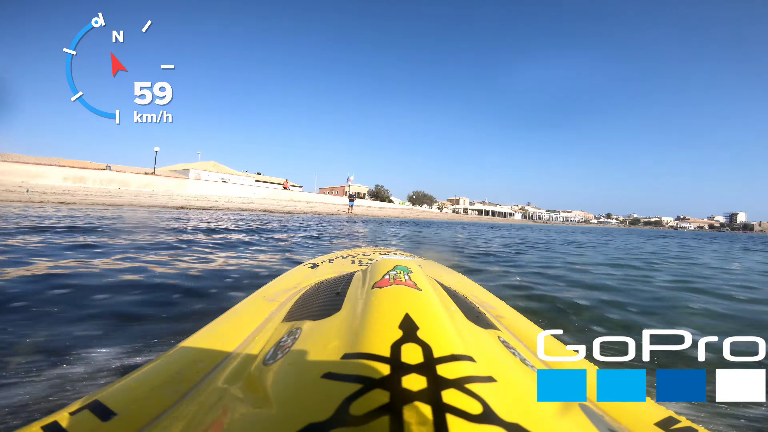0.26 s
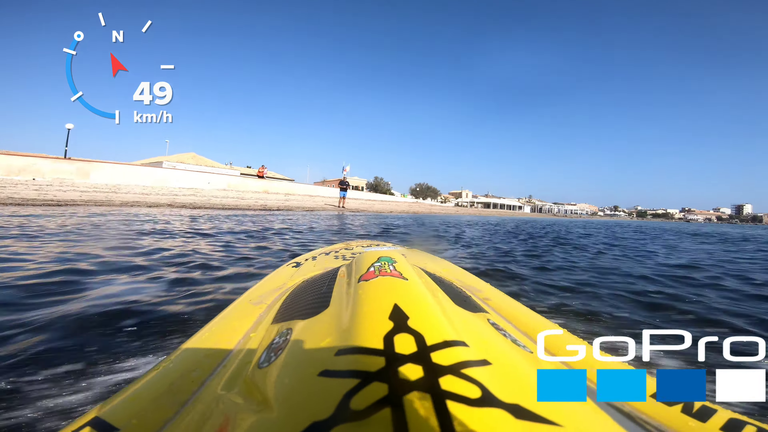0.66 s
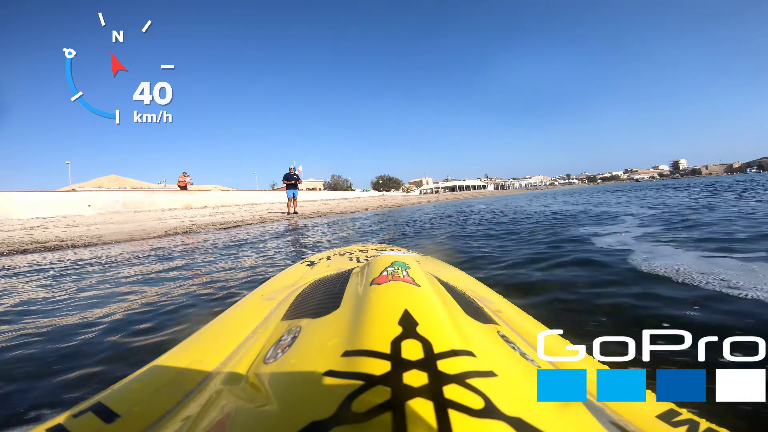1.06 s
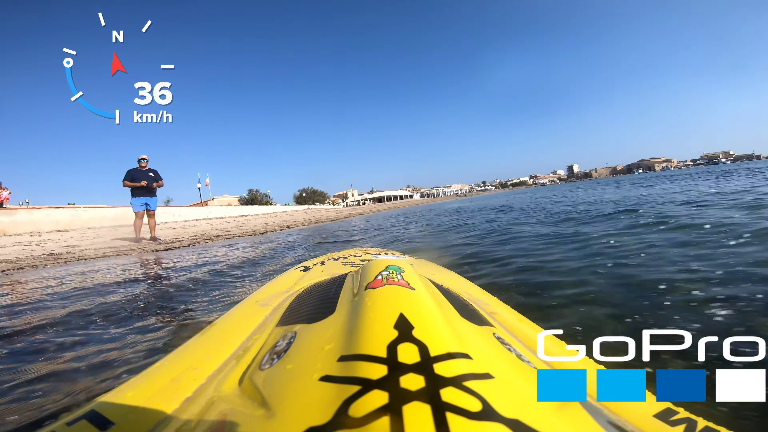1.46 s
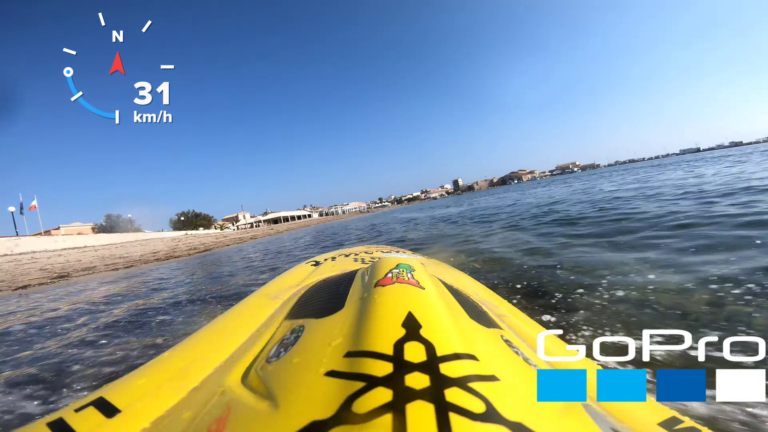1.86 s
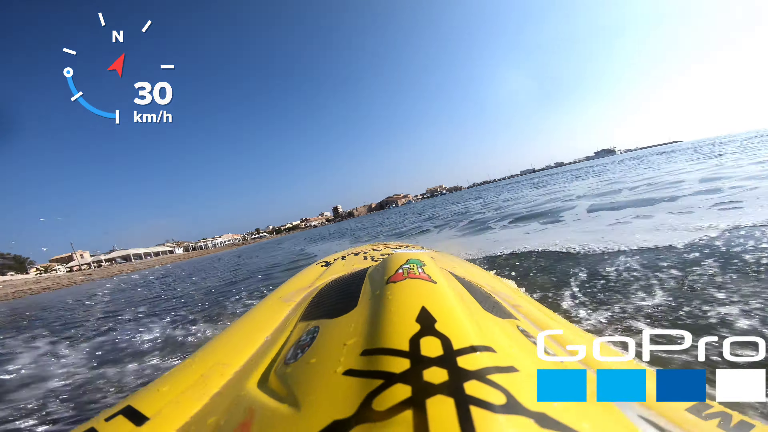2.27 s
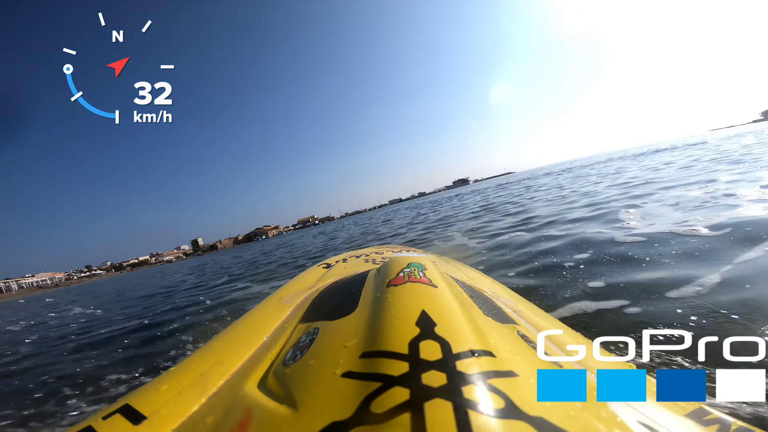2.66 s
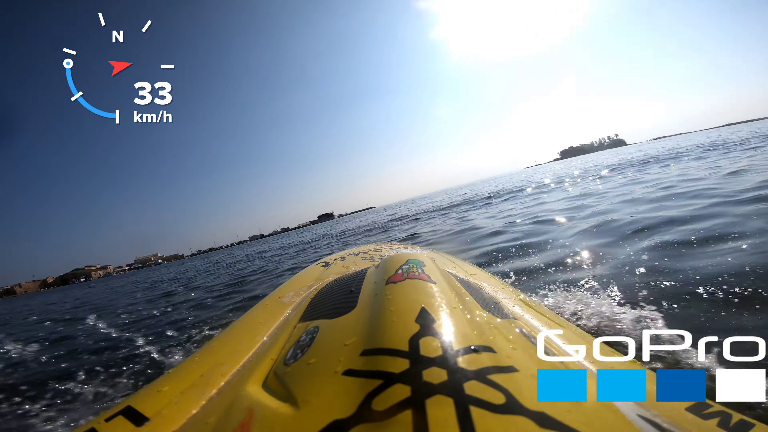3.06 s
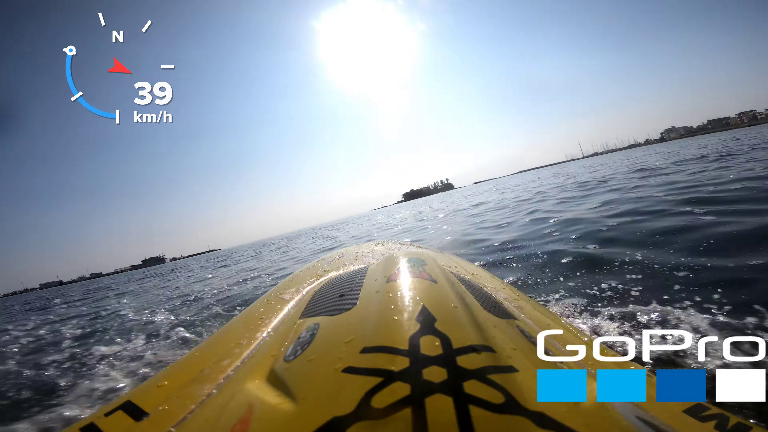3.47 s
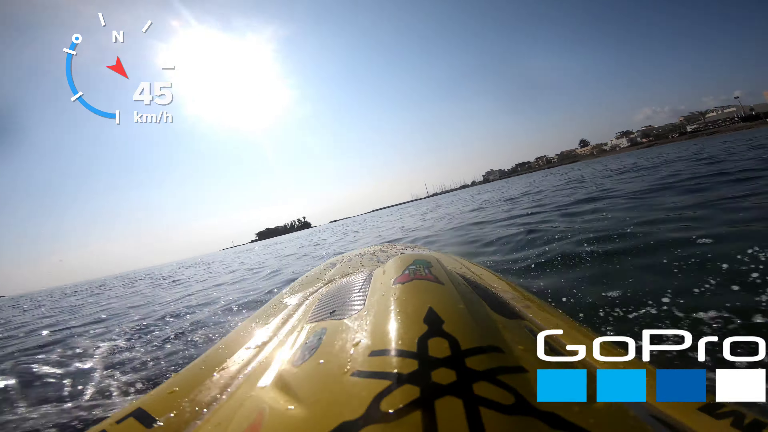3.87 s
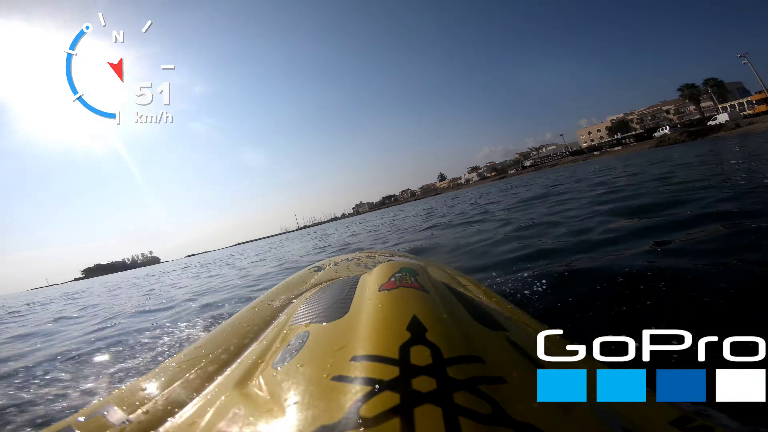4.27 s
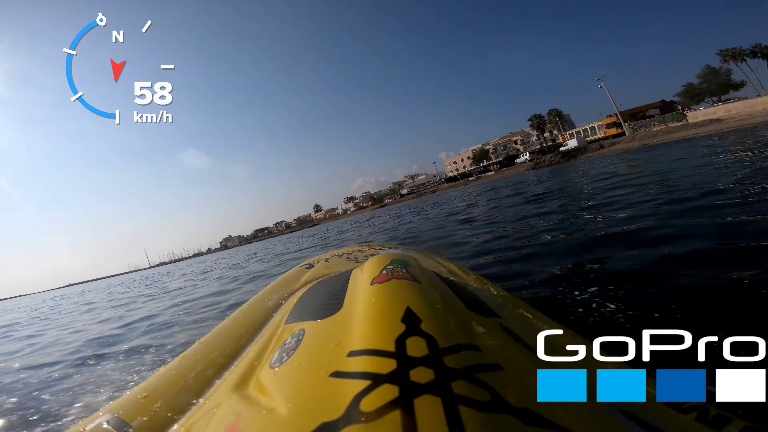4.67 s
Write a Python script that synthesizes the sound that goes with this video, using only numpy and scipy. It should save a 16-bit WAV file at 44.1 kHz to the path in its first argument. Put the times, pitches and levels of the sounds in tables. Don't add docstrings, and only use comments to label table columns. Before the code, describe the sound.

Buzzing electric propeller whine falls, wavers and rises again, heard through a plastic hull with low water rumble, slaps and rough sputters.

```python
import sys
import numpy as np
from scipy import signal
from scipy.fft import rfft, irfft, next_fast_len
from scipy.io import wavfile
from scipy.ndimage import uniform_filter1d

SR = 44100
rng = np.random.default_rng(int(sys.argv[2]) if len(sys.argv) > 2 else 0)


def to_wav(sig):
    pcm = np.clip(np.atleast_2d(sig), -1, 1) * 32767
    pcm = np.round(pcm).astype(np.int16)
    wavfile.write(sys.argv[1], SR, pcm.T)


def gain_from_decibels(decibels):
    exponent = np.asarray(decibels, float) / 20
    return 10 ** exponent


N = 261321
REFERENCE_TURNS = 400

# frequency in Hz, level in dB per Hz.
RATTLE_SPECTRUM = [(530, -30.5), (900, -10.5), (1190, -3.5), (1300, -3), (1570, -6), (1730, -8.5),
                   (2270, -14), (2570, -10), (3060, -12.5), (3640, -18), (4110, -9.5), (4400, -11),
                   (5070, -26), (5800, -67)]


def rms_one(x):
    return x / np.sqrt(np.mean(x ** 2) + 1e-20)


def in_time(rows):
    seconds, *columns = np.transpose(rows)
    return [np.interp(np.arange(N) / SR, seconds, column) for column in columns]


def humps(rows, power=2):
    t = np.arange(N) / SR
    return np.array([np.exp(-((t - row[0]) / row[1]) ** power) for row in rows])


def drift(rate):
    every = 20
    pole = np.exp(-2 * every * np.pi * rate / SR)
    steps = rng.standard_normal(N // every + 4002)
    slow = signal.lfilter([1], [1, -2 * pole, pole * pole], steps)[4000:]
    return np.interp(np.arange(N) / every, np.arange(len(slow)), rms_one(slow))


def lift(peaks, at):
    return sum(lift_db / (1 + (2 * (at - centre) / width) ** 2) for centre, width, lift_db in peaks)


def speed_law(turns, reference_db, below_db, above_db):
    octaves = np.log2(turns / REFERENCE_TURNS)
    return reference_db + below_db * np.minimum(octaves, 0) + above_db * np.maximum(octaves, 0)


def resonance(x, hz, width):
    pole = np.exp(-np.pi * width / SR)
    feedback = [1, -2 * pole * np.cos(2 * np.pi * hz / SR), pole * pole]
    return signal.lfilter(np.array([1, 0, -1]) * (1 - pole * pole) / 2, feedback, x)


def hull_db(spectrum, hz):
    # resonance in Hz, width in Hz, lift in dB.
    deck = [(273.8, 35, 6), (475, 27, 2), (1094, 370, 6), (1460, 92, 7.5), (2550, 120, 5.5), (3100, 300, 8),
            (4450, 2000, -3)]
    point_hz, point_db = np.transpose(spectrum)
    return np.interp(np.log(hz), np.log(point_hz), point_db) + lift(deck, hz)


def through_hull(x, spectrum):
    size = next_fast_len(N)
    hz = np.maximum(np.fft.rfftfreq(size, 1 / SR), 10)
    return rms_one(irfft(rfft(x, size) * gain_from_decibels(hull_db(spectrum, hz)), size)[:N])


def thumps(per_s, spread_db):
    # frequency in Hz, width in Hz, level in dB.
    modes = [(51.4, 20, 5), (94.3, 19, -1.5), (121.6, 28, -5.5), (143.4, 42, -19.5)]
    out = 0
    for hz, width, level_db in modes:
        sizes = gain_from_decibels(spread_db * np.minimum(rng.exponential(1, N), 3)) * rng.choice([-1, 1], N)
        knocks = (rng.random(N) < per_s / SR) * sizes
        ringing = resonance(resonance(knocks, hz, width), hz, 3 * width)
        out = out + gain_from_decibels(level_db) * rms_one(ringing)
    return rms_one(signal.sosfilt(signal.butter(2, 35, "high", fs=SR, output="sos"), out))


def slaps():
    # peak in seconds, level in dB.
    slap_times = [(.04, -14), (.37, -15.5), (.49, -19), (0.631, -18.5), (.76, -24), (1.1, -19), (1.26, -25),
                  (1.41, -20.5), (1.69, -15.5), (1.95, -22), (2.34, -22), (2.6, -25), (2.78, -16),
                  (2.95, -22), (3.17, -15), (3.4, -16), (3.6, -17.5), (3.85, -43), (4.221, -19),
                  (4.35, -18.5), (4.48, -22), (4.64, -20), (4.92, -21), (5.11, -10), (5.22, -19),
                  (5.45, -16), (5.66, -17), (5.83, -11.5)]
    rise_s, fall_s = 0.029, 0.05
    peak_s, level_db = np.transpose(slap_times)
    since = np.arange(N) / SR - peak_s[:, None]
    return gain_from_decibels(level_db) @ np.exp(-(since / np.where(since < 0, rise_s, fall_s)) ** 2)


def wash(patchy_db):
    # frequency in Hz, level in dB per Hz.
    wash_spectrum = [(90, -58), (150, -39), (190, -32.5), (240, -6.5), (330, -12.5), (400, -5),
                     (528, -13.5), (600, -18.5), (800, -30), (1470, -30.5), (2200, -38), (2860, -78.5)]
    lumps_db = patchy_db * (drift(15) + 0.72 * drift(75))
    return through_hull(rng.standard_normal(N) * gain_from_decibels(lumps_db), wash_spectrum)


def spray(angle, gate, patchy_db):
    # frequency in Hz, level in dB per Hz.
    spray_spectrum = [(4200, -23.5), (5100, 2.5), (5600, 0.5), (6200, 1.5), (6800, -1.5), (7300, 0),
                      (7800, -7.5), (8500, -6), (9500, -14), (10500, -13.5), (11000, -22.5), (12500, -20),
                      (13500, -24.5), (15500, -45.5)]
    pulsing = 1 + gate * np.cos(angle)
    spurts = gain_from_decibels(patchy_db * (drift(22) + drift(150)))
    return through_hull(rng.standard_normal(N) * pulsing * spurts, spray_spectrum)


def rattle(angle, gate, patchy_db):
    pulsing = 1 + gate * np.cos(angle)
    return through_hull(rng.standard_normal(N) * pulsing * gain_from_decibels(patchy_db * drift(37)), RATTLE_SPECTRUM)


def air_bites():
    # centre in seconds, half length in seconds, shake in radians, froth in dB,
    # racing in extra turns per s.
    bites = [
        (0.293, .045, 0.2, -38, 30),
        (0.49, 0.034, 0.25, -34, 2),
        (1.738, 0.022, 0.23, -29, 1),
        (2.782, 0.056, 0.22, -40, 1),
        (4.901, .045, 0.5, -19, 45),
        (5.074, .008, 0.28, -23.5, 1.5),
        (5.204, 0.035, 0.56, -20, 28),
        (5.411, 0.065, 0.32, -28, -1),
    ]
    bells = humps(bites, power=4)
    _, _, shake, froth_db, race = np.transpose(bites)
    return shake @ bells, gain_from_decibels(froth_db) @ bells, race @ bells


def froth_noise():
    white = rng.standard_normal(N) * gain_from_decibels(1.4 * drift(40))
    rings = 0
    for hz, width, gain in [(1450, 240, 1), (2850, 600, 0.17), (4200, 800, 0.2)]:
        rings = rings + gain * rms_one(resonance(resonance(white, hz, width), hz, width))
    return rms_one(signal.sosfilt(signal.butter(6, 4800, fs=SR, output="sos"), rings))


def surges():
    # centre in seconds, half length in seconds, extra turns per s, imbalance tone in dB.
    waves = [(0.191, .08, -7, 3.5), (0.263, 0.057, 0, -2.5), (0.398, 0.035, 0, -11.5), (0.473, .04, 24, -3),
             (0.573, 0.024, 0, 2), (0.654, .04, -4, -3), (1.291, .05, -13.5, -3), (3.31, .04, 6, 2),
             (1.648, .08, 0, -4.5), (1.964, 0.03947, 10, -1.5), (2.097, 0.075, -1, 3), (2.338, .1, -7, 0.5),
             (2.597, 0.0707, -4.5, 1), (2.796, .05, 2.5, -14), (3.193, .07, -9, -2.5), (3.446, .04, -5, 1),
             (3.554, .04, 6, 1), (3.78, .12, -9, 0.5), (4.072, .05, -5, 0), (4.193, 0.052, 6, -1),
             (4.278, .04, -3.5, -2.5), (4.641, 0.037, 7.5, -5.5), (4.812, .03, -8, -2.5),
             (4.973, 0.027, 1, 3.5), (5.036, .03, -6, -6), (5.142, 0.066, -2, -0.5),
             (5.385, 0.064, 0.5, -5.5), (5.459, .04, -6.5, -3), (5.601, .05, -8, 2.5),
             (5.77, .05, 9.5, 2.5)]
    return np.transpose(waves)[2:] @ humps(waves)


def chopper():
    return np.sqrt(2) * gain_from_decibels(-88) * np.sin(2 * np.pi * 7966 * np.arange(N) / SR)


def whip(angle, turns, flutter_db):
    # multiple of shaft speed, level in dB.
    half_orders = [(.5, 0), (1.5, -13), (2.5, -15), (3.5, -15), (5.5, -24), (6.5, -18)]
    # turns per s, width in turns per s, lift in dB.
    critical_speeds = [(265, 17, 8), (415.7, 45, 17), (596, 230, -7.5)]
    lines = sum(gain_from_decibels(db) * np.sin(k * angle + rng.uniform(0, 2 * np.pi)) for k, db in half_orders)
    level_db = -40.5 + lift(critical_speeds, turns) + flutter_db * drift(24)
    return np.sqrt(2) * gain_from_decibels(level_db) * lines


def order_levels(turns, load_db, imbalance_db):
    # dB at the reference speed, dB gained per doubling of speed,
    # share of the blade load.
    order_law = [(-16, -5, 0.067), (-21.5, 0.9, 1.3), (-34.5, 0, 0.5), (-34, 7, 1.3), (-41, 3, 0.9),
                 (-47, 5.5, 0.2)]
    # Hz, width in Hz, lift in dB.
    mount = [(259, 34, -5.5), (308, 61, 1.5), (400, 73, 5.5), (524, 30, 1.5), (602, 80, 2), (708, 81, 5.5),
             (840, 125, -14.5), (1080, 110, 2.5), (1373, 200, 2.5), (1590, 180, 4.5), (1811, 62, 6.5),
             (1992, 170, -11), (2565, 180, 7.5), (2870, 340, 2.5)]
    # centre in seconds, half length in seconds, dB.
    order_spells = [
        [(1.0, .08, 3), (4.05, .1, -4), (4.73, .06, -11.5), (5.83, .06, -11)],
        [(.52, .05, 12), (3.4, .3, -4.5), (4.25, .06, -7.5), (4.55, .15, 1), (5.4, .06, 8.5)],
        [(1.15, .2, -5), (2.0, .06, -12.5), (2.42, .17, 5), (3.2, .06, -14), (3.87, .08, -1.5), (4.5, .08, -7),
         (4.9, .2, 5.5), (5.4, .05, -8)],
        [(.15, .2, -5.5), (1.0, .25, -11.5), (1.68, .12, 8), (2.55, .15, 8), (3.05, .2, -9.5), (4.7, .04, 8.5)],
        [(.15, .15, -10), (.49, .04, 9.5), (2.8, .05, 4), (3.42, .06, -5), (3.65, .12, 6.5), (4.57, .04, 9.5),
         (5.4, .05, 6)],
    ]
    # centre and half length in seconds, dB.
    further_spells = [
        [(.04, 0.065, 3.5), (.17, 0.036, -4.5), (.46, 0.033, 9), (4.17, .07, -4.5), (5.35, .03, 5.5),
         (1.35, 0.053, -4.5), (2.2, .4, 2.5), (3.5, 0.059, -4.5), (5.52, 0.053, -6.5)],
        [(1.43, 0.048, -12), (1.72, .13, 6.5), (2.55, 0.16, 6.5), (4.07, .08, 8.5), (5.03, 0.041, 6)],
        [(2.55, 0.041, 8), (3.39, .1, 2.5), (4.22, 0.037, -2.5), (2.8, 0.055, 8), (5.46, 0.018, 9)],
        [(4.1, .15, -0.5), (4.47, 0.096, -13.5), (5.04, 0.037, 9.5), (5.75, .12, 7)],
        [(1.0, .06, -5.5), (1.7, .1, 8.5), (4.3, 0.037, 7), (4.42, .05, -8), (4.67, 0.041, 0)],
    ]
    octaves = np.log2(turns / REFERENCE_TURNS)
    levels = []
    for k, (db, gain_db, share) in enumerate(order_law, 1):
        levels.append(db + gain_db * octaves + share * load_db + lift(mount, k * turns))
    levels[0] = levels[0] + imbalance_db
    for i, (own, more) in enumerate(zip(order_spells, further_spells), 1):
        spells = list(own) + list(more)
        settling_db = 1.17 * drift(1.7)
        levels[i] = levels[i] + np.transpose(spells)[2] @ humps(spells) + settling_db
    return levels


def motor(angle, turns, tones_db, rattle_db, flutter_db):
    # multiple of shaft speed, dB against the rattle at that pitch.
    weak_orders = [(7, -8), (8, -7), (9, -9), (10, -9), (12, -10), (14, -9), (15, -11)]
    out = 0
    for k, tone_db in enumerate(tones_db, 1):
        level_db = tone_db + flutter_db * k ** 0.41 * drift(30)
        out = out + gain_from_decibels(level_db) * np.sin(k * angle + rng.uniform(0, 2 * np.pi))
    sharpen_db = 11.5 * np.log2(turns / REFERENCE_TURNS)
    for k, order_db in weak_orders:
        level_db = rattle_db + order_db + hull_db(RATTLE_SPECTRUM, np.maximum(k * turns, 900))
        level_db += sharpen_db + 1.8 * drift(9) + 3 * drift(30)
        out += gain_from_decibels(level_db) * np.sin(k * angle + rng.uniform(0, 2 * np.pi))
    return np.sqrt(2) * out


def scene():
    # time in seconds, shaft turns per s.
    throttle = [(0, 635), (.365, 628), (.412, 455), (.62, 312), (.8, 263), (.99, 245), (1.17, 299),
                (1.4, 341), (1.9, 293), (2.68, 300.4), (2.88, 353), (4.4, 466), (4.6, 524), (4.72, 634),
                (5.32, 636), (5.375, 464), (5.55, 359), (5.93, 279)]
    # time in seconds, blade load in dB, shaking in dB.
    strain = [(0, -1.5, -1), (.34, 0, 1), (.42, -6.5, -5.5), (.5, -4.5, 1), (.62, -6.5, 1.5),
              (.95, 1.5, 1.5), (1.25, -4, 0), (1.7, -2, 2.5), (2.2, 0.5, 0.5), (2.8, -4, 4), (3.3, 0, 1),
              (3.8, -2.5, -2.5), (4.3, 2.5, 3), (4.6, 4, -0.5), (4.8, -2, 1), (5.3, -1, 1), (5.42, 1.5, 0),
              (5.65, -9, 0)]
    # time in seconds, chop in dB, wetted area in dB.
    water_state = [(0, -18, 4), (.15, -19, 5), (.3, -24, -6), (.55, -24, -1.5), (.75, -20.5, 2.5),
                   (1.3, -24.5, 0.5), (1.8, -20.5, 1.5), (2.5, -26, -0.5), (3.05, -23, 3.5),
                   (3.4, -24, -1.5), (3.7, -27, -4.5), (4.1, -24.5, 4), (4.3, -20.5, -4), (4.7, -14, 5),
                   (5.0, -19.5, -6), (5.3, -14, 0.5), (5.5, -18, -0.5), (5.93, -24, 0.5)]
    demand, = in_time(throttle)
    load_db, shaking_db = in_time(strain)
    chop_db, wetted_db = in_time(water_state)
    surge, imbalance_db = surges()
    shake, froth, race = air_bites()

    inertia_s = 0.018
    turns = uniform_filter1d(demand, size=int(inertia_s * SR)) + surge
    load_db = load_db - 9 * shake
    rattle_db = speed_law(turns, -45, 4.6, 8.3) + shaking_db + 10 * shake + 12
    spray_db = speed_law(turns, -65.5, 2, 18.7) + shaking_db + 10.5 * shake
    chop, slap = gain_from_decibels(chop_db), slaps()
    wash_db = speed_law(turns, -23, -4.5, -12.5) + wetted_db + 2.5 * slap / (slap + chop)

    slowing = uniform_filter1d(np.maximum(-np.gradient(turns) * SR, 0), size=1000)
    play, backlash = 0.05, 0.00012
    shake = shake + play + backlash * slowing
    wander = 0.06 * drift(25)
    angle = 2 * np.pi * np.cumsum(turns + race) / SR + wander + shake * drift(57)

    water = np.hypot(chop, slap) * thumps(per_s=500.0, spread_db=-1.5)
    water += gain_from_decibels(wash_db) * wash(patchy_db=2.4)
    water += gain_from_decibels(spray_db) * spray(angle, gate=0.35, patchy_db=1.0)
    buzz = gain_from_decibels(rattle_db) * rattle(angle, gate=0.25, patchy_db=1.5) + froth * froth_noise()
    tones_db = order_levels(turns + race, load_db, imbalance_db)
    drive = motor(angle, turns + race, tones_db, rattle_db, flutter_db=2.0)
    drive += whip(angle, turns, flutter_db=4.0) + chopper()
    return (drive + water + buzz)[None]


def low_pass(x):
    return signal.sosfilt(signal.butter(12, 14690, fs=SR, output="sos"), x)


def record(dry):
    limited = 1.3 * np.tanh(dry / 1.3)
    sealed = signal.sosfilt(signal.butter(4, 10500, fs=SR, output="sos"), limited)
    return low_pass(sealed)


dry = scene()
out = record(dry)
to_wav(out)
```